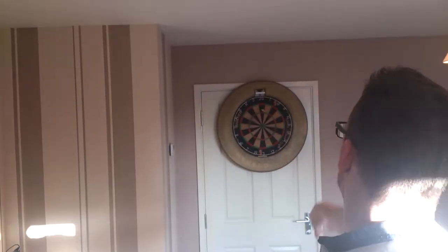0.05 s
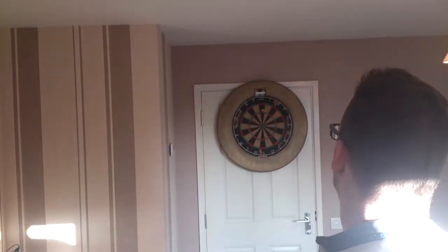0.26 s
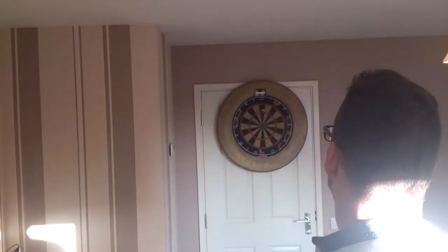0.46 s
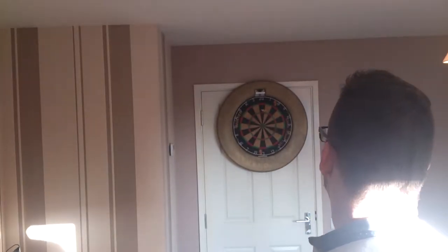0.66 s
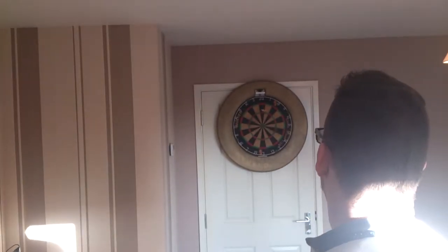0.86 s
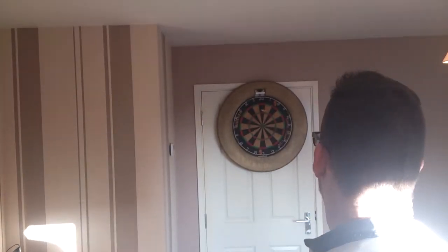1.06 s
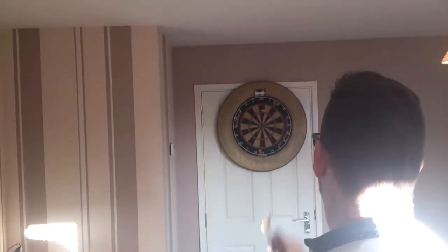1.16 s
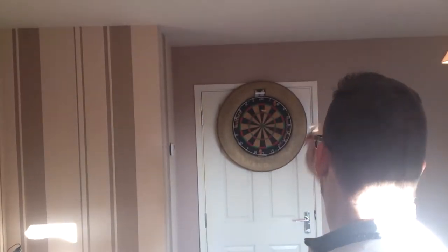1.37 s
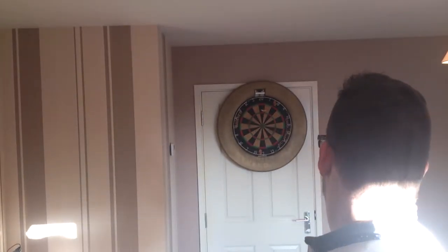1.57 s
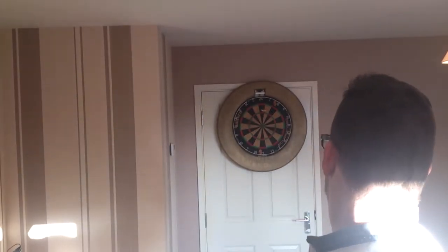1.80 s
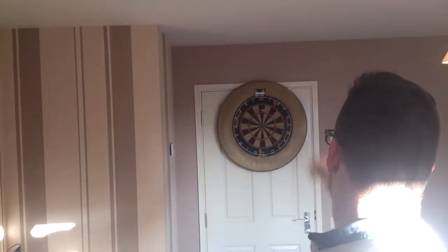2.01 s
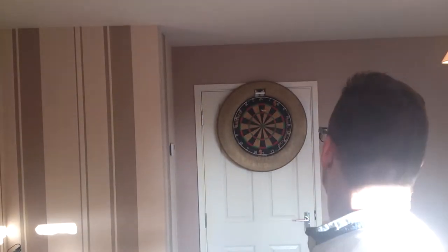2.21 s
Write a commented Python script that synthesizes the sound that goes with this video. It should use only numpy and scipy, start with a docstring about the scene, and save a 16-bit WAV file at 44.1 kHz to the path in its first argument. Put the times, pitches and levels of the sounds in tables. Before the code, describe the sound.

One dart hits a dartboard with a crunchy thud, over faint room hiss.

```python
"""A small, quiet room: one dart hits a bristle board hung on a door.
The point crunches into the fibres and the steel zings. Board and door thud and shudder,
something rattles briefly, and the room reverberates. A faint cloth rustle follows; later a small
motor spins up to a thin whine. Hiss and rumble lie underneath. The microphones are opposed in the bass."""
import sys
import numpy as np
from scipy import signal
from scipy.fft import rfft, irfft
from scipy.io import wavfile
from scipy.ndimage import uniform_filter1d

SR = 44100
rng = np.random.default_rng(int(sys.argv[2]) if len(sys.argv) > 2 else 0)


def master(y):
    """Save y as 16-bit WAV."""
    cut = np.clip(np.atleast_2d(y).T, -1, 1)
    pcm = np.round(cut * 32767)  # scale
    wavfile.write(sys.argv[1], SR, pcm.astype(np.int16))


N = 99225
T = np.arange(N) / SR

# Board and door modes. Each row: frequency in Hz, level in dB, T60 in seconds.
THUD_MODES = [(196, -41, .38), (267.8, -37, 0.25), (319, -37.5, 0.31), (359, -26, 0.33), (387, -29, 0.36),
              (403.4, -17, 0.076), (439.3, -36, 0.37), (547.8, -29, 0.2), (610, -33.5, 0.41),
              (646, -28.5, 0.22), (708, -30, 0.15), (766, -28.5, 0.18), (800.5, -22, 0.12),
              (822, -32, 0.24), (865, -37, 0.38), (992, -42.5, 0.32), (1117, -36.5, .13),
              (1205, -47.5, .19)]
# Early wall reflections. Each row: delay in seconds, gain in dB.
WALL_ECHOES = [(.0073, -7), (.025, -8), (0.062, -18.5)]
# Fibres giving way. Each row: frequency in Hz, relative density in dB.
CRUNCH_SPECTRUM = [(150, -27), (400, -1.5), (1000, 6.5), (1350, -4), (1600, 2.5), (2100, -2.5), (2700, 1.5),
                   (3250, -5), (3900, 3), (5700, 1.5), (7000, 1), (8000, -6.5), (10000, -2.5), (12500, -6),
                   (15500, -16)]
# Rattle. Each row: frequency in Hz, relative density in dB.
RATTLE_SPECTRUM = [(300, -26), (1200, 4), (2500, 2), (4000, 2), (7000, -12), (15000, -19)]
# Crunch and rattle balance. Each row: frequency in Hz, left minus right in dB.
DART_BALANCE = [(300, 8), (1200, -8), (2500, -4), (5000, -11.5), (9000, -10.5), (15000, -9)]
# Dart steel and board wires. Each row: frequency in Hz, level in dB, T60 in seconds.
STEEL_MODES = [(1632, -51, 0.3), (3735, -44.5, 0.32), (3904, -45, 0.22), (4490, -38, 0.26),
               (5123, -41, 0.17), (5470, -46, 0.32), (5668, -37, 0.32), (6159, -49.5, .3),
               (6685, -48, 0.29)]
# Door swaying in its frame. Each row: frequency in Hz, level in dB, T60 in seconds.
SWAY_MODES = [(20.6, -34, 0.65), (56.8, -40, .75), (76.3, -33.5, 0.71), (103, -43, 0.27)]
# Room decay. Each row: frequency in Hz, T60 in seconds.
ROOM_DECAY = [(100, 0.47), (400, 0.32), (800, 0.35), (2000, 0.36), (5500, 0.37), (8000, 0.3), (14000, 0.16)]
# Motor spin-up. Each row: time in seconds, pitch in Hz, level in dB.
MOTOR_RUN = [(1.1, 1100, -85), (1.26, 1210, -85), (1.328, 1248, -59), (1.389, 1330, -82), (1.46, 1405, -80),
             (1.5, 1430, -63), (1.68, 1425, -64.5), (2.03, 1437, -63), (2.25, 1426, -62)]
# Cloth swell. Each row: peak time in seconds, half-width in seconds, level in dB.
CLOTH_SWELLS = [(0.78, 0.042, -68.5)]
# Cloth noise. Each row: frequency in Hz, relative density in dB.
CLOTH_SPECTRUM = [(1000, -2), (3000, 4), (5500, 6), (8000, -7), (15000, -9)]
# Hiss and rumble. Each row: frequency in Hz, relative density in dB.
AIR_SPECTRUM = [(10, 15), (35, 16.5), (65, 10.5), (98, 14), (140, 6.5), (260, -0.5), (430, 4.5), (620, 3.5),
                (850, -2), (1150, 1), (1700, -5.5), (2170, -7.5), (2380, -2.5), (2600, -10), (3100, -13.5),
                (5300, -15), (7000, -24), (8300, -24), (9600, -19), (12500, -19), (15500, -20.5)]
# Air and cloth balance. Each row: frequency in Hz, left minus right in dB.
AIR_BALANCE = [(20, 3), (100, -1), (250, -2.5), (500, -5), (1100, -6), (2400, -4), (5000, -5.5), (10000, 0),
               (15000, -4.5)]
# Microphone pair. Each row: frequency in Hz, left-right correlation.
MIC_CORRELATION = [(30, -0.91), (130, -0.861), (290, -0.75), (640, -0.51), (1400, 0.12), (3100, 0.025),
                   (15000, -0.032)]

POINT_S, THUD_S, RATTLE_S = 0.2165, 0.232, 0.349  # point enters, dart stops, rattle starts
CONTACT_S = 0.0024


def thud(left_db=-4, left_lag_s=0.00017, wet_db=-10.5):
    """The knock reaches the left microphone inverted and late; the room rings on."""
    direct = ring(THUD_MODES, THUD_S, CONTACT_S)
    reverb = amp(wet_db) * room(np.array([direct, direct]))
    early = np.array([-knock(THUD_S + left_lag_s), knock(THUD_S)])
    return (early + reverb) * amp([[left_db], [0]])


def knock(start_s):
    """Board and door ring from the blow; near walls reflect it."""
    echoes = sum(amp(db) * ring(THUD_MODES, start_s + delay_s, CONTACT_S) for delay_s, db in WALL_ECHOES)
    return ring(THUD_MODES, start_s, CONTACT_S) + echoes


def dart(crunch_db=-34, rattle_db=-47.5, wet_db=-2.5):
    """The point crunches through the fibres; a faint rattle follows."""
    bite = burst(POINT_S, rise_s=0.013, decay_after_s=0.025, tau_s=0.013)
    shake = burst(RATTLE_S, rise_s=0.004, decay_after_s=0, tau_s=0.018)
    crunch = amp(crunch_db) * bite * noise(CRUNCH_SPECTRUM, DART_BALANCE)
    rattle = amp(rattle_db) * shake * noise(RATTLE_SPECTRUM, DART_BALANCE)
    snaps = (crunch + rattle) * flicker(depth_db=1.5, samples=30)
    return snaps + amp(wet_db) * room(snaps)


def steel(rise_s=0.012, left_db=-15):
    """Dart and wires zing on entry; each partial chatters on its own."""
    zing = sum(ring([mode], POINT_S, rise_s) * flicker(depth_db=8.5, samples=400) for mode in STEEL_MODES)
    return zing * amp([[left_db], [0]])


def door(left_db=-3):
    """The whole door shudders after the blow, inverted on the left."""
    sway = ring(SWAY_MODES, THUD_S, rise_s=0.012)
    return np.array([-amp(left_db) * sway, sway])


def room(x, delay_s=0.0046, rise_s=0.0046):
    """Dense random reflections; each band decays at its own rate."""
    hz, t, bands = signal.stft(mic_noise(), SR, nperseg=256)
    decay = amp(-60 * t / lookup(ROOM_DECAY, hz)[:, None])
    tail = signal.istft(bands * decay, SR, nperseg=256)[1][:, :N]
    tail *= np.minimum(since(delay_s) / rise_s, 1)
    return signal.fftconvolve(x, tail / np.linalg.norm(tail[1]), axes=1)[:, :N]


def motor(waver_fraction=0.0015, left_db=-7.5):
    """A small motor's whine climbs and settles, wavering slightly."""
    times_s, hz, db = np.transpose(MOTOR_RUN)
    pitch_hz = np.interp(T, times_s, hz) * (1 + waver_fraction * wander(samples=2000))
    cycles = np.cumsum(pitch_hz) / SR
    gain = amp(np.interp(T, times_s, db)) * (T > times_s[0])
    return gain * np.sin(2 * np.pi * cycles) * amp([[left_db], [0]])


def cloth():
    """One soft swell of cloth noise."""
    swell = sum(amp(db) * np.exp(-((T - peak_s) / half_s) ** 2) for peak_s, half_s, db in CLOTH_SWELLS)
    return swell * noise(CLOTH_SPECTRUM, AIR_BALANCE)


def air(level_db=-54.5, patch_db=1.13):
    """Steady hiss and rumble, slightly patchy in frequency and time."""
    bands = signal.stft(noise(AIR_SPECTRUM, AIR_BALANCE), nperseg=1024, noverlap=768)[2]
    patches = uniform_filter1d(rng.standard_normal(bands.shape[1:]), size=12, axis=0)
    patches = unit_rms(uniform_filter1d(patches, size=14, axis=1))
    hiss = signal.istft(bands * amp(patch_db * patches), nperseg=1024, noverlap=768)[1][:, :N]
    return amp(level_db) * hiss


def ring(modes, start_s, rise_s):
    """Damped sines from one blow."""
    t = since(start_s)
    partials = sum(amp(db - 60 * t / t60_s) * np.sin(2 * np.pi * hz * t) for hz, db, t60_s in modes)
    return np.minimum(t / rise_s, 1) * partials


def burst(start_s, rise_s, decay_after_s, tau_s):
    """Envelope: linear rise, exponential decay."""
    return np.minimum(since(start_s) / rise_s, 1) * np.exp(-since(start_s + decay_after_s) / tau_s)


def noise(spectrum, balance):
    """Coloured stereo noise, rms 1 on the right."""
    hz = np.fft.rfftfreq(N, 1 / SR)
    right = unit_rms(amp(lookup(spectrum, hz)))
    left = right * amp(lookup(balance, hz))
    return irfft(rfft(mic_noise()) * np.array([left, right]), N)


def mic_noise():
    """White stereo noise with the microphones' correlation."""
    independent, right = rfft(rng.standard_normal((2, N)))
    correlation = lookup(MIC_CORRELATION, np.fft.rfftfreq(N, 1 / SR))
    left = correlation * right + np.sqrt(1 - correlation ** 2) * independent
    return irfft(np.array([left, right]), N)


def flicker(depth_db, samples):
    """Random gain, rms 1."""
    return unit_rms(amp(depth_db * wander(samples)))


def wander(samples):
    """Smoothed noise, rms 1."""
    return unit_rms(uniform_filter1d(rng.standard_normal(N), samples))


def lookup(table, hz):
    """Interpolates on a log-frequency axis."""
    knots_hz, values = np.transpose(table)
    return np.interp(np.log(hz + 1), np.log(knots_hz + 1), values)


def since(start_s):
    """Seconds elapsed, zero before the start."""
    return np.maximum(T - start_s, 0)


def unit_rms(x):
    """Scales to rms 1."""
    return x / np.sqrt(np.mean(x ** 2) + 1e-20)


def amp(db):
    """Decibels to gain."""
    return 10 ** (np.asarray(db) / 20)


def scene():
    """The hit over the quiet room."""
    return dart() + steel() + thud() + door() + cloth() + air() + motor()


def record(dry, cutoff_hz=15550):
    """The recorder's band limit."""
    lowpass = signal.firwin(511, cutoff_hz, window=("kaiser", 9), fs=SR)
    return signal.oaconvolve(dry, lowpass[None], "same")


dry = scene()
out = record(dry)
master(out)
```